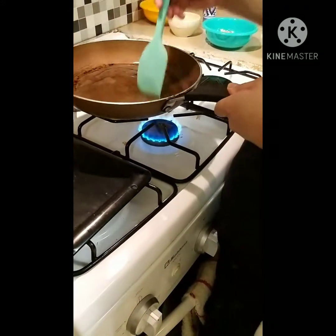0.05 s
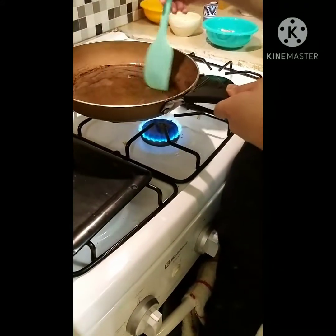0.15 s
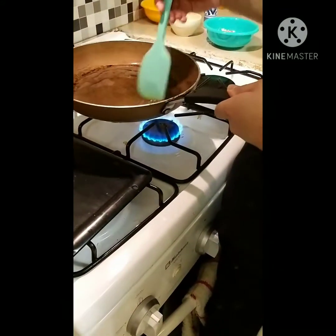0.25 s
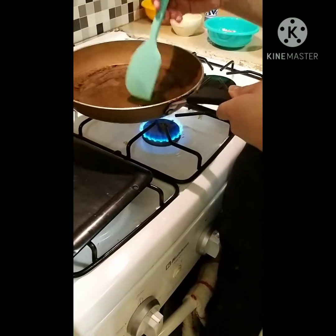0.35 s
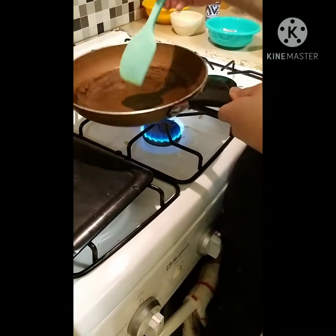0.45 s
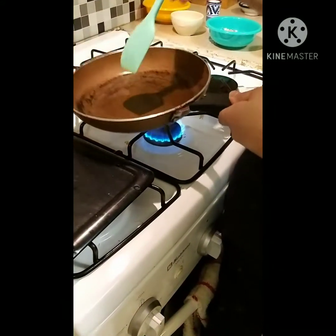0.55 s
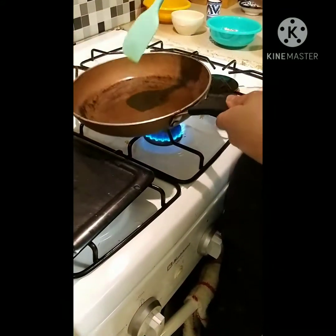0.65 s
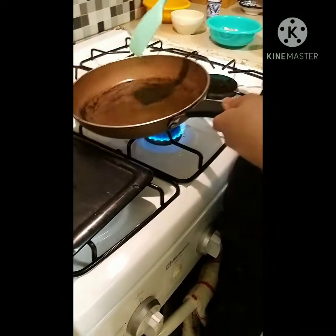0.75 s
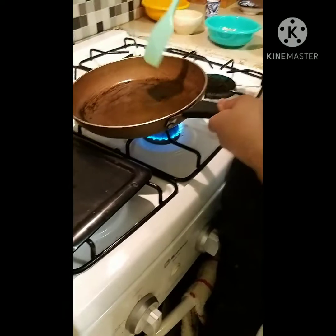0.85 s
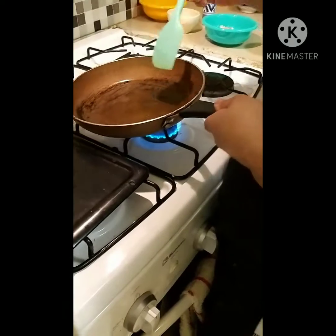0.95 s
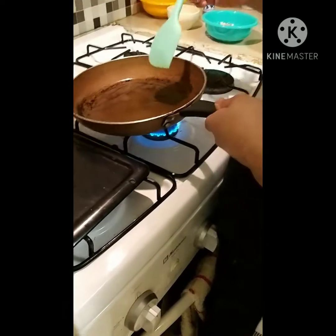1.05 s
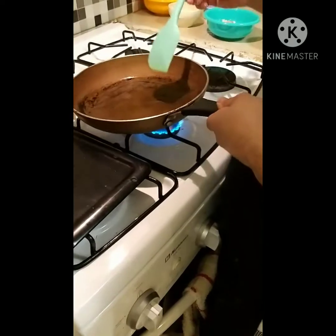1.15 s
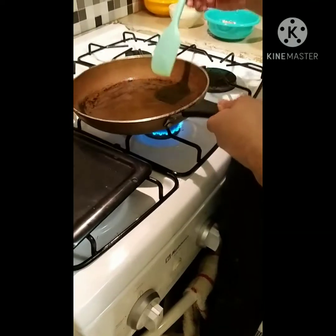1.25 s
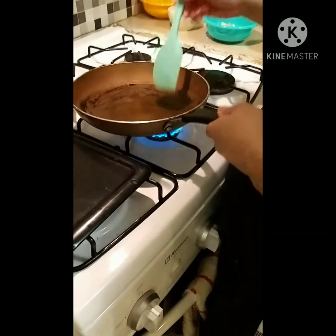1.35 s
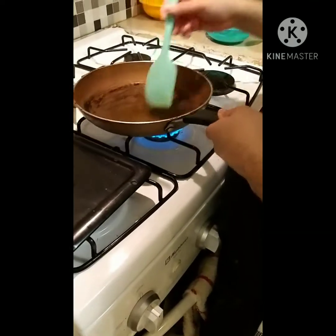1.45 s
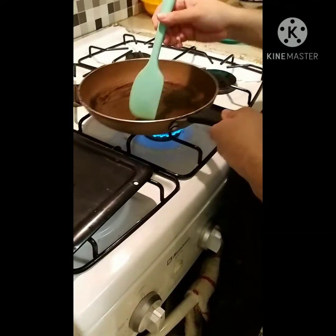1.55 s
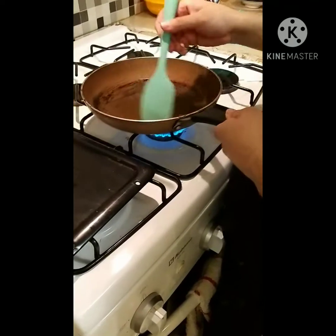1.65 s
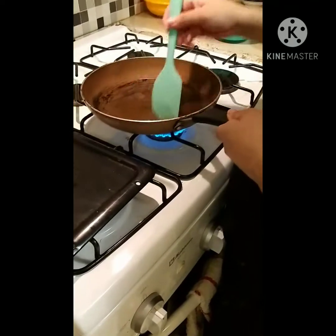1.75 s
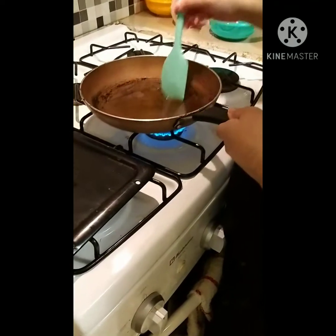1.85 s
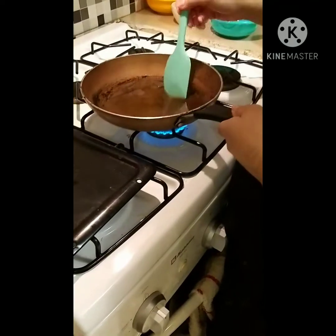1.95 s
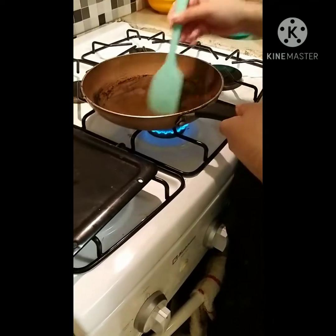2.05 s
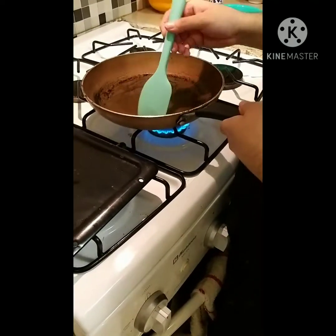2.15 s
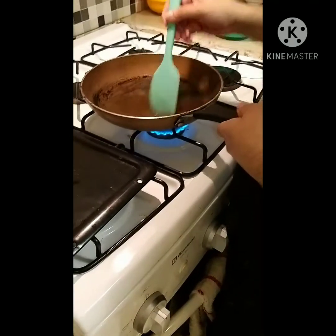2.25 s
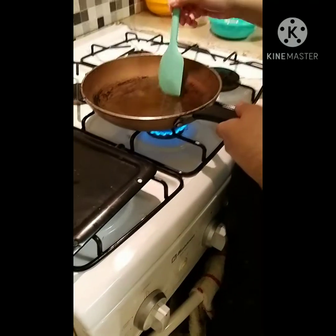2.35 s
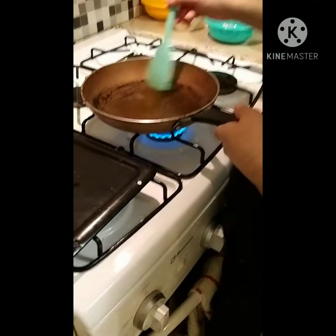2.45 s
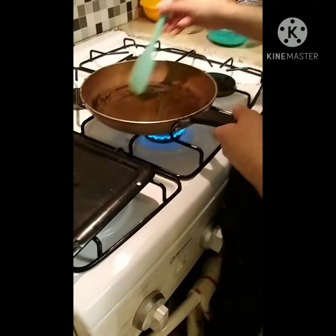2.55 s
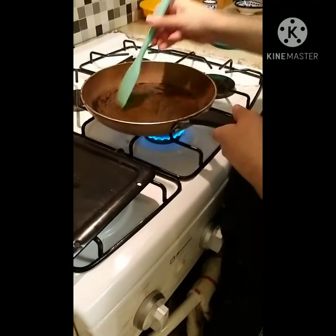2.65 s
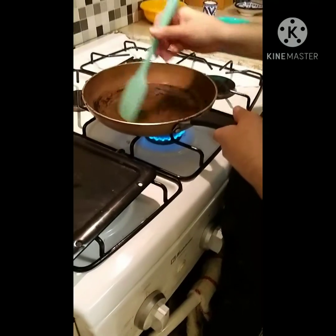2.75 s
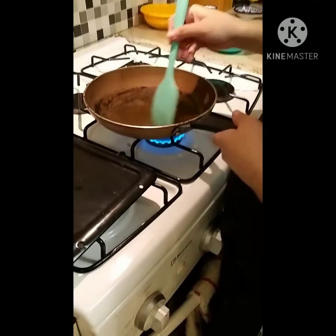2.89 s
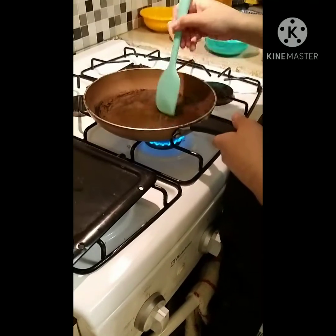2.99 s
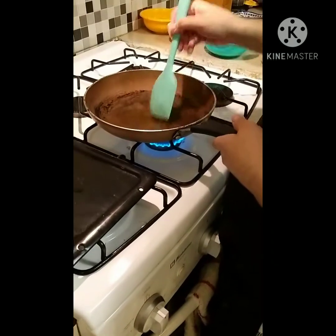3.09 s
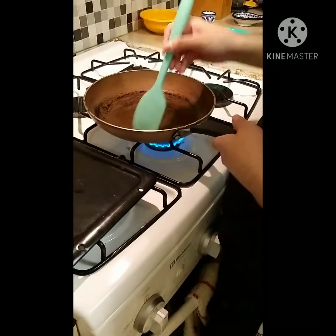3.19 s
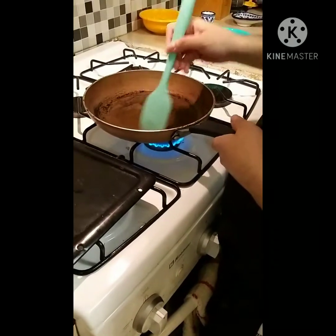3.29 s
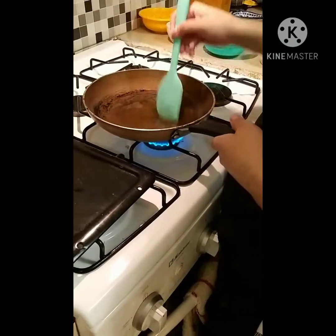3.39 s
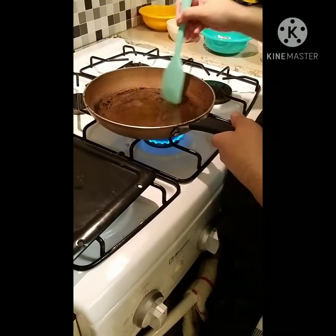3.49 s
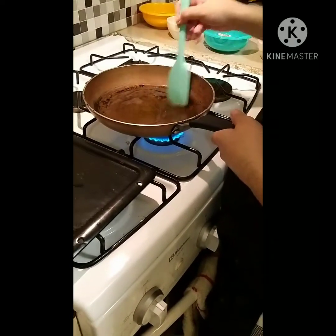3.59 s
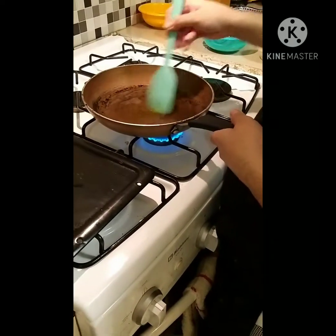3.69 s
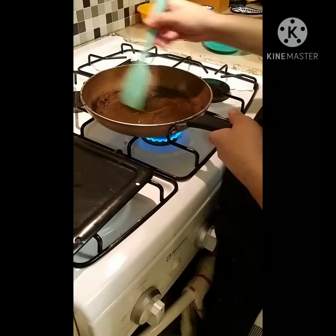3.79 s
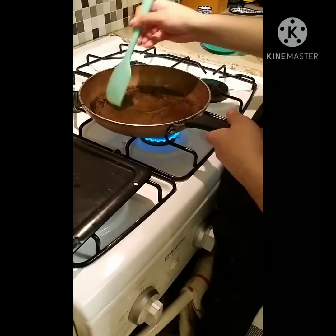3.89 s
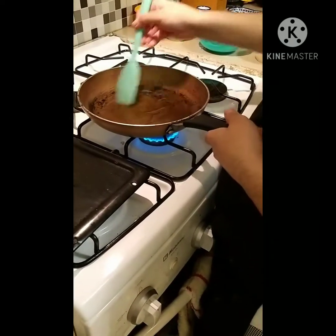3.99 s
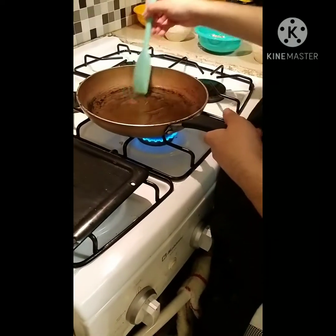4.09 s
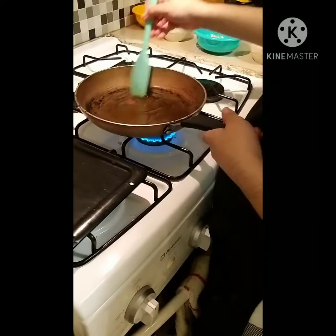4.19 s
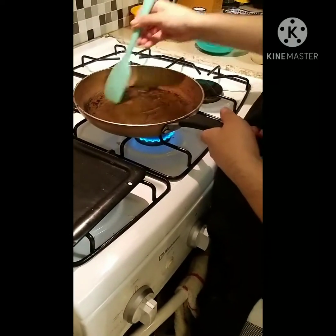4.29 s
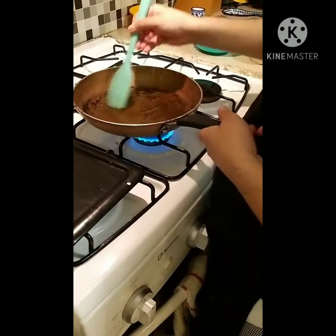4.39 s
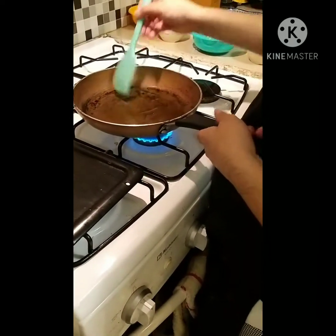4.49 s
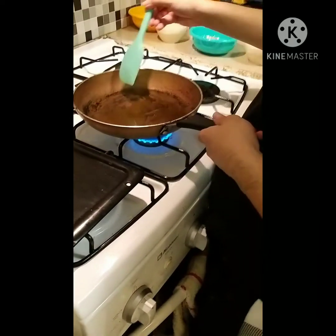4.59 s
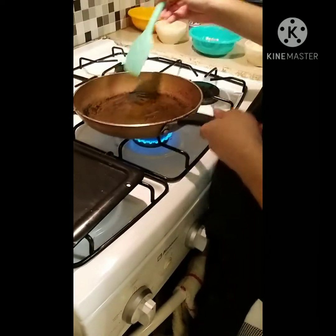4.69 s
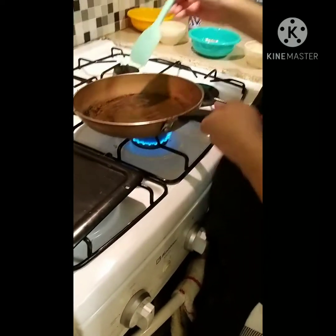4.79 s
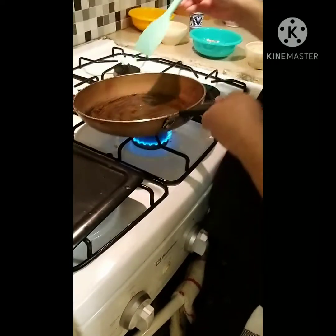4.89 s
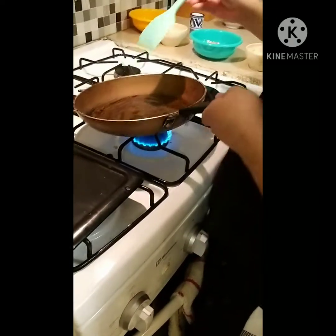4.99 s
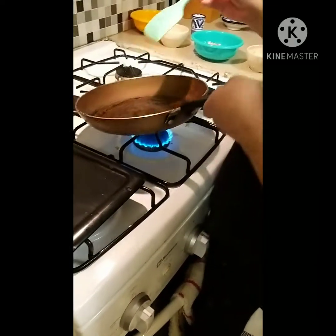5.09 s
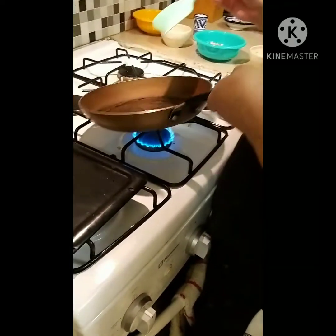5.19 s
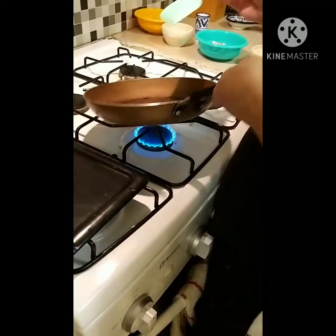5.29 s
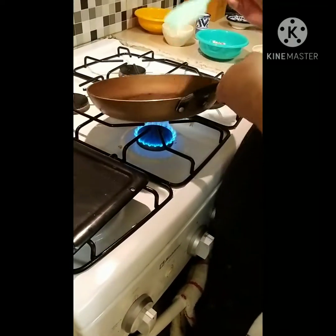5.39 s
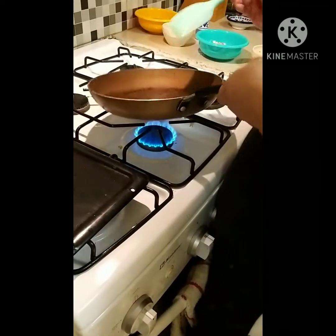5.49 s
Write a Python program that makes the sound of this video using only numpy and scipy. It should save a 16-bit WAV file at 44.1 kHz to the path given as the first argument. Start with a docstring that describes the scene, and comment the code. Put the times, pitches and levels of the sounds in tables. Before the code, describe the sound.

In a small tiled kitchen, a pan clanks down on wire burner supports, followed by faint spatula taps and a final soft knock.

```python
"""Frying pan on a gas stove

A frying pan is set down on the wire grate of a gas stove, rocks, and knocks again as it is lifted; a soft spatula
wipes at the start and again later, and taps the pan between the knocks. Blows are sums of dying modes (modal
synthesis) plus shaped noise for the clatter. The sheet-metal stove top booms under each knock, and a small
tiled kitchen answers by convolution. Behind lie a motor's hum, made of harmonics, and the burner's rush,
made of filtered noise."""
import sys
import numpy as np
from scipy import signal
from scipy.fft import rfft, irfft
from scipy.io import wavfile
from scipy.ndimage import uniform_filter1d, minimum_filter1d

SR = 44100
rng = np.random.default_rng(int(sys.argv[2]) if len(sys.argv) > 2 else 0)


def put_to_file(sound):
    """Save the sound as 16-bit audio at rate SR, in the file named by the first command-line argument."""
    columns = np.atleast_2d(sound).T  # one column per channel
    safe = np.clip(columns, -1, 1)
    whole_steps = np.round(safe * 32767)
    wavfile.write(sys.argv[1], SR, whole_steps.astype(np.int16))


N = 244314
T = np.arange(SR) / SR  # the second that follows a blow


def amp(db):
    """Logarithmic level: turns decibels into an amplitude factor."""
    return 10 ** (np.asarray(db) / 20)


def unit(x):
    """Root-mean-square level: scales a signal to rms 1."""
    return x / np.sqrt(np.mean(x ** 2) + 1e-20)


def read(points, hz):
    """Logarithmic pitch scale: interpolates a table along log frequency."""
    f, value = np.transpose(points)
    return np.interp(np.log(hz + 1), np.log(f), value)


def sides(db):
    """Interaural level difference: left and right gains that lie db apart."""
    return amp(np.array([[db], [-db]]) / 2)


def add(mix, s, sound):
    """Superposition: mixes a stereo sound in at time s."""
    part = mix[:, round(s * SR):][:, :sound.shape[1]]
    part += sound[:, :part.shape[1]]


def decay(t60):
    """Exponential decay: the envelope falls by 60 dB in t60 seconds."""
    return np.exp(-np.log(1000) * T / t60)


def drift(rate_hz):
    """Low-frequency random modulation: a slow wander of rms 1."""
    hz = np.fft.rfftfreq(N, 1 / SR)
    return unit(irfft(rfft(rng.standard_normal(N)) * np.exp(-hz / rate_hz), N))


# Likeness of the two sides. Each row: frequency in Hz, left-right correlation from 0 to 1.
SIDE_LIKENESS = [(30, 0.87), (150, 0.91), (300, .93), (600, 0.28), (1200, 0.017), (5000, 0.045),
                 (15000, 0.1)]


def noise(colour, size):
    """Interaural coherence: coloured stereo noise of rms 1, alike on both sides in the bass."""
    hz = np.fft.rfftfreq(size, 1 / SR)
    a, b = rfft(rng.standard_normal((2, size)))
    same = np.clip(read(SIDE_LIKENESS, hz), -1, 1)
    right = same * a + np.sqrt(1 - same ** 2) * b
    return unit(irfft(np.array([a, right]) * amp(read(colour, hz)), size))


def fade(x, t60):
    """Frequency-dependent damping: lets every band die at its own speed."""
    hz, t, z = signal.stft(x, SR, nperseg=256)
    z = z * np.exp(-np.log(1000) * t / read(t60, hz)[:, None])
    return signal.istft(z, SR, nperseg=256)[1][:, :SR]


def tilt(hz, hardness, edge_hz):
    """Contact-time filtering: a harder, shorter blow favours the treble, up to an edge; in dB."""
    slope_db = hardness * np.log2(np.clip(hz, 400, 7000) / 2000)
    return slope_db - 10 * np.log10(1 + (hz / edge_hz) ** 6)


def partial(hz, t60, spacing_hz=900):
    """Damped oscillation: a dying sine, more out of step between the microphones the higher it is."""
    start, lag = rng.random(), rng.uniform(-1, 1)
    phase = 2 * np.pi * start + np.array([[0], [lag * min(hz / spacing_hz, 2)]])
    onset = 1 - np.exp(-hz * T)  # swells within about a cycle
    return onset * decay(t60) * np.sin(2 * np.pi * hz * T + phase)


def ring(modes, hardness, edge_hz, split=0.0086, twin=1.0, twin_life=.3):
    """Mode splitting: an uneven object gives each mode a shorter-lived twin close by."""
    out = np.zeros((2, SR))
    for hz, db, t60 in modes:
        twin_hz = hz * (1 + split * rng.uniform(-1, 1))
        pair = partial(hz, t60) + twin * partial(twin_hz, t60 * twin_life)
        out += amp(db + tilt(hz, hardness, edge_hz)) * pair
    strength = np.linalg.norm(amp([mode[1] for mode in modes]))
    return out / strength / np.hypot(1, twin)


# Unevenness of the crowded modes. Each row: frequency in Hz, rms ripple in dB.
MODE_RIPPLE = [(300, -0.5), (1000, 4.5), (6000, 4.5), (8000, 5.5), (15000, 7.5)]
# Quick decay of the clatter. Each row: frequency in Hz, t60 in seconds.
CLATTER_DECAY = [(100, 0.18), (800, 0.24), (3000, 0.19), (7000, 0.15), (14000, 0.05)]


def clatter(colour, modes, hardness, edge_hz, width_hz=70, valley=.35, crack=0.26, crack_s=0.0044):
    """High modal density: a crack of contact and brief rough rattle, strongest around the object's modes."""
    hz = np.arange(20, 16000, 20)
    peaks = sum(1 / (1 + ((hz - mode[0]) / width_hz) ** 2) for mode in modes)
    body = 1 / (1 + (hz / 1500) ** 2)  # low down the stove answers at every frequency
    db = read(colour, hz) + tilt(hz, hardness, edge_hz)
    db += 20 * np.log10(valley + np.minimum(peaks + body, 1))
    # each contact wakes other minor modes
    db += read(MODE_RIPPLE, hz) * unit(uniform_filter1d(rng.standard_normal(len(hz)), size=8))
    rattle = fade(noise(np.column_stack([hz, db]), SR), CLATTER_DECAY)
    onset = 1 - np.exp(-T * edge_hz / 2)  # a lower edge starts more gently
    return rattle * onset * (1 + crack * np.exp(-T / crack_s))


# Modes of the pan held by its handle. Each row: frequency in Hz, relative level in dB, unpressed t60 in seconds.
PAN_MODES = [(474, -7.5, 0.51), (565, -9.5, 0.13), (803, -1.5, 0.79), (969, -5, 0.9), (976, -2.5, 0.56),
             (1443, -1, 0.42), (1488, -3.5, 0.4), (2054, -9, .36), (2548, -3, .5), (2664, -6.5, 0.45),
             (2956, -5.5, 0.18), (3610, -12, 0.3), (4170, -9, .6), (4724, -15, 0.22), (5100, -12.5, 0.12),
             (5526, -14, 0.42), (6350, -12, 0.33), (6843, -12.5, 0.13), (7237, -17.5, 0.15),
             (7650, -18.5, .25), (8416, -14, 0.18), (10590, -25.5, .16)]
# Modes of the wire grate. Each row: frequency in Hz, relative level in dB, unpressed t60 in seconds.
GRATE_MODES = [(750, -13, 0.2), (825, -9, 1.05), (854, -7.5, 0.28), (1089, -12, 0.2), (1380, -7.5, 0.3),
               (1892, -3, 0.21), (1960, -9.5, 0.42), (2408, -4.5, 0.12), (3020, -11, 0.27),
               (3540, -7, 0.18), (4200, -15, 0.2), (5180, -6.5, 0.17), (5560, -10, 0.21),
               (6190, -11.5, 0.26), (6990, -7.5, 0.15), (8080, -12, 0.36), (8880, -15, .1)]
# Modes of the sheet-metal stove top. Each row: frequency in Hz, relative level in dB, t60 in seconds.
STOVE_MODES = [(76, -1, 0.14), (109.5, -6.5, .22), (129.1, -5, 0.76), (143.2, -9.5, 0.38),
               (168, -8.5, 0.11), (273.5, -9, 0.7)]
# Colour of the knocks' clatter. Each row: frequency in Hz, relative density in dB per Hz.
KNOCK_COLOUR = [(30, -36.5), (70, -0.5), (200, -3.5), (380, -5.5), (800, 4), (1200, -2), (1650, -3),
                (2600, -3.5), (3800, -5.5), (5400, -6.5), (6900, -7), (7500, -15), (9500, -12.5),
                (12500, -17), (15500, -18)]
# Pan against grate; the spot where it lands brings out one note. Each row: start in seconds, force in dB,
# hardness in dB per octave, treble edge in Hz, note in Hz, note level in dB relative to the force.
PAN_KNOCKS = [(1.028, -28.5, -1, 11000, 973, -3), (1.038, -31.5, -2.5, 8000, 1400, -8),
              (1.0814, -29, -1, 13000, 4205, -1), (1.094, -32.5, -3, 9000, 2670, -6.5),
              (1.332, -31.5, -3, 7500, 694, -8), (1.3469, -17.5, 7, 13500, 7000, 0),
              (1.352, -20.5, 0, 11000, 2020, 10), (1.360, -16.5, 1, 12000, 1892, 4),
              (1.397, -17, 4, 15500, 2408, -4.5), (1.403, -17, 0.5, 15500, 3020, 6),
              (1.427, -21, 0, 11850, 5103, -12), (1.437, -24.5, -4.5, 10000, 774, -10),
              (1.582, -33, 1.5, 7000, 4170, 6), (4.7209, -28, -.5, 7200, 2030, 9),
              (4.748, -40, -4.5, 5000, 1448, 1.5), (4.767, -34.5, -1.5, 7000, 2548, -9)]
# A knock of middling force: its level, and how much stove, pan and grate answer, in dB.
KNOCK_DB, BOOM_DB, PAN_DB, GRATE_DB = -30.5, -6, -3.5, -9
# Per dB of extra force the boom lags behind, the pan is pressed still and the grate rings more, in dB.
BOOM_LAG, PAN_DAMPING, GRATE_GROWTH = 0.62, 0.18, 0.45
CHOKE_PER_S = 2.5  # pressed metal also dies sooner: dB a second for each dB of extra force
NOTE_T60_S = 0.081


def knocks(clatter_db=0.5, boom_rise_s=0.0021, side_db=5.0, ring_side_db=5.0, note_side_db=6, boom_side_db=3.5):
    """Impact excitation: each knock rings pan and grate and swells a stove boom; force sets the blend."""
    out, notes = np.zeros((2, 2, N))
    boom = sum(amp(db) * decay(t60) * np.sin(2 * np.pi * hz * T) for hz, db, t60 in STOVE_MODES)
    boom = sides(boom_side_db) * boom * (1 - np.exp(-T / boom_rise_s))
    for s, db, hardness, edge_hz, note_hz, note_db in PAN_KNOCKS:
        extra_db = db - KNOCK_DB
        pressed_db = max(extra_db, 0)
        rattle = amp(clatter_db) * clatter(KNOCK_COLOUR, PAN_MODES + GRATE_MODES, hardness, edge_hz)
        rings = amp(PAN_DB - PAN_DAMPING * pressed_db) * ring(PAN_MODES, hardness, edge_hz)
        rings += amp(GRATE_DB + GRATE_GROWTH * extra_db) * ring(GRATE_MODES, hardness, edge_hz)
        rings *= amp(-CHOKE_PER_S * pressed_db * T)
        knock = sides(side_db) * rattle + sides(ring_side_db) * rings
        knock += amp(BOOM_DB - BOOM_LAG * extra_db) * boom
        add(notes, s, amp(db + note_db) * sides(note_side_db) * partial(note_hz, NOTE_T60_S))
        add(out, s, amp(db) * knock)
    return out, notes


# Modes of the pan resting on the grate. Each row: frequency in Hz, relative level in dB, t60 in seconds.
RESTING_MODES = [(844, -5, 0.88), (1108, -19, 0.15), (1365, -1.5, 0.5), (2074, -0.5, 0.14),
                 (2030, -2.5, 0.6), (2900, -21.5, 0.15), (4580, -14.5, 0.14), (4980, -44, 0.18),
                 (5600, -13, 0.5), (6800, -17, .15)]
# Colour of the taps' clatter. Each row: frequency in Hz, relative density in dB per Hz.
TAP_COLOUR = [(100, -7), (500, -10.5), (900, -0.5), (1300, -8.5), (2000, 5.5), (3000, -2), (5000, -6.5),
              (6900, -10), (9000, -15.5), (11000, -32), (15500, -40)]
# Spatula on the pan; some taps leave the rim free to ping.
# Each row: start in seconds, force in dB, ping level in dB relative to the force.
SPATULA_TAPS = [(2.409, -53.5, -7.5), (3.2486, -39.5, 0), (3.2825, -41.5, -12), (3.648, -62.5, 7.5),
                (3.9486, -46, -8), (4.335, -47.5, -9), (4.6038, -51.5, -16.5), (4.6928, -52, 0)]
# A firm tap: level in dB, hardness in dB per octave, treble edge in Hz.
TAP_DB, TAP_HARDNESS, TAP_EDGE_HZ = -40.5, 0.86, 7000
# Per dB of force: change of hardness and of the edge in octaves; lighter taps tilt to the bass, edge higher.
TAP_HARDNESS_PER_DB, TAP_OCT_PER_DB = 0.97, -0.67
PING_HZ, PING_T60_S = 2020, 0.13


def taps(ring_db=-9, rise_s=0.00089, damp_s=0.078, side_db=3):
    """Contact damping: the soft blade nudges the pan against its grate and at once damps the rattle."""
    out = np.zeros((2, N))
    for s, db, ping_db in SPATULA_TAPS:
        hardness = TAP_HARDNESS + TAP_HARDNESS_PER_DB * (db - TAP_DB)
        edge_hz = TAP_EDGE_HZ * 2 ** (TAP_OCT_PER_DB * (db - TAP_DB))
        tap = clatter(TAP_COLOUR, RESTING_MODES, hardness, edge_hz, valley=0.58, crack=1.12)
        tap = tap * np.exp(-T / damp_s)
        tap = tap + amp(ring_db) * ring(RESTING_MODES, hardness, edge_hz)
        tap = tap + amp(ping_db) * partial(PING_HZ, PING_T60_S)
        add(out, s, amp(db) * sides(side_db) * tap * (1 - np.exp(-T / rise_s)))
    return out


# Colour of the wiping hiss. Each row: frequency in Hz, relative density in dB per Hz.
WIPE_HISS = [(6000, -34.5), (9000, -9), (11500, -5), (13000, -5), (15500, -8)]
# Strokes of the spatula sliding in oil. Each row: time of the fastest point in seconds, peak level in dB,
# time constant of swell and fade in seconds.
WIPE_STROKES = [(0.01, -62.5, .13), (2.59, -75, .04), (2.79, -68.5, 0.11)]


def wipes():
    """Friction noise: a thin hiss swells and fades with each stroke of the blade."""
    t = np.arange(N) / SR
    strokes = sum(amp(db) * np.exp(-abs(t - s) / swell_s) for s, db, swell_s in WIPE_STROKES)
    return noise(WIPE_HISS, N) * strokes


# Colour of the kitchen's reflections. Each row: frequency in Hz, relative level in dB.
TAIL_COLOUR = [(60, -2.5), (200, 4.5), (500, -2.5), (15000, -0.5)]
# Decay of the kitchen. Each row: frequency in Hz, t60 in seconds.
KITCHEN_DECAY = [(100, 1), (300, 0.77), (800, 0.94), (2500, 0.83), (5500, 0.64), (8000, 0.53),
                 (14000, 0.67)]
# Echoes off worktop and tiled wall. Each row: left delay in seconds, right delay in seconds, level in dB.
NEAR_ECHOES = [(.0023, 0.0016, -12), (.0056, 0.0067, -14.5), (.0092, 0.0097, -9), (0.0135, .0141, -8.5),
               (0.0188, 0.022, -11.5)]


def kitchen(x, wet_db=-6, build_s=0.004, cross=0.38):
    """Reverberation: near echoes and dense reflections carry each side's sound to both microphones."""
    tail = fade(noise(TAIL_COLOUR, SR), KITCHEN_DECAY) * (1 - np.exp(-T / build_s)) ** 2
    tail *= amp(wet_db) / np.linalg.norm(tail, axis=1, keepdims=True)
    for left_s, right_s, db in NEAR_ECHOES:
        tail[[0, 1], [round(left_s * SR), round(right_s * SR)]] += amp(db)
    crossed = (1 - cross) * x + cross * x[::-1]
    return signal.fftconvolve(crossed, tail, axes=1)[:, :N]


# Fundamental and each overtone in turn. Each row: rms level in dB before the swell, waver from 0 to 1.
HUM_ORDERS = [(-54.5, .08), (-65.5, 0), (-53.5, .42), (-62, 0.7), (-61, 0.4), (-76, 0)]
HUM_HZ = 59.1
# Slow swell of the fundamental, quicker one of the overtones: time of one crest in s, period in s, depth in dB.
SLOW_SWELL, QUICK_SWELL = (2.4, 3.1, 2.6), (3.1, 1.114, 1.8)


def hum(waver_hz=4, side_db=1.65):
    """Harmonic series: a motor's low orders swell and ebb, most of them wavering in strength and phase."""
    t = np.arange(N) / SR
    out = np.zeros(N)
    for order, (db, waver) in enumerate(HUM_ORDERS, 1):
        crest_s, period_s, depth_db = SLOW_SWELL if order == 1 else QUICK_SWELL
        swell_db = depth_db * np.cos(2 * np.pi * (t - crest_s) / period_s)
        phase = 2 * np.pi * (order * HUM_HZ * t + rng.random())
        tone = (1 - waver + waver * drift(waver_hz)) * np.cos(phase)
        tone += waver * drift(waver_hz) * np.sin(phase)
        out += amp(db + swell_db) * unit(tone)
    return sides(side_db) * out


# Colour of the burner and the still kitchen. Each row: frequency in Hz, relative density in dB per Hz.
RUSH_COLOUR = [(25, -32), (42, -20.5), (56, -7.5), (88, -16.5), (125, 0), (200, -5.5), (310, -4.5),
               (430, -10.5), (800, -16), (1500, -22), (2900, -25), (4500, -31), (6800, -31.5),
               (8200, -39.5), (15500, -43)]
RUSH_DB = -53


def burner(flutter_db=0.53, flutter_hz=12, side_db=2.1):
    """Turbulence noise: the soft, slightly fluttering rush of the gas flame."""
    return sides(side_db) * noise(RUSH_COLOUR, N) * amp(RUSH_DB + flutter_db * drift(flutter_hz))


def scene(note_room_db=-6):
    """Linear superposition: blows and wipes over hum and flame; the contact notes stay fairly dry."""
    metal, notes = knocks()
    hits = metal + taps()
    room = kitchen(hits + amp(note_room_db) * notes)
    return hits + notes + room + hum() + burner() + wipes()


LOUD_DB, RATIO, HOLD_S, RECOVER_DB_PER_S = -24, 1.296, 0.85, 4  # threshold, ratio, hold and recovery


def gain_control(x, sense_s=0.012):
    """Dynamic range compression: turns down on a loud sound, holds, then recovers."""
    keep = np.exp(-1 / (sense_s * SR))
    power = signal.lfilter([1 - keep], [1, -keep], (x ** 2).mean(0))
    power_db = 10 * np.log10(power + 1e-12)
    wanted_db = -np.maximum(power_db - LOUD_DB, 0) * (1 - 1 / RATIO)
    hold = round(HOLD_S * SR)
    # the origin makes the window look back in time
    held_db = minimum_filter1d(wanted_db, hold, origin=(hold - 1) // 2, mode="nearest")
    climb_db = RECOVER_DB_PER_S * np.arange(N) / SR
    return x * amp(np.minimum.accumulate(held_db - climb_db) + climb_db)


EDGE_HZ = 15550  # upper band limit


def record(dry):
    """Band limiting: the small microphone drops the deepest bass; gain control and a low-pass follow."""
    thin = signal.sosfilt(signal.butter(4, 42, "highpass", fs=SR, output="sos"), dry)
    low_pass = signal.firwin(401, EDGE_HZ, window=("kaiser", 8), fs=SR)
    return signal.oaconvolve(gain_control(thin), low_pass[None], "same")


dry = scene()
out = record(dry)
put_to_file(out)
```